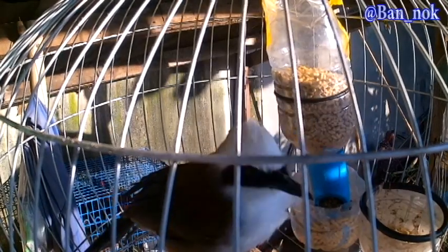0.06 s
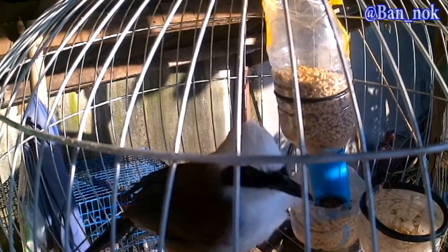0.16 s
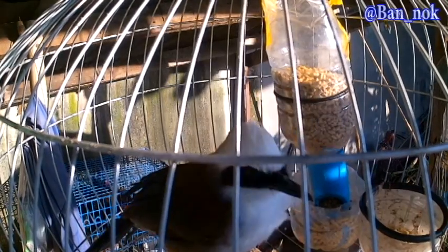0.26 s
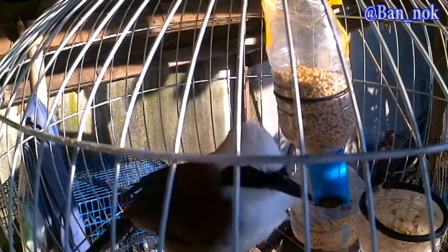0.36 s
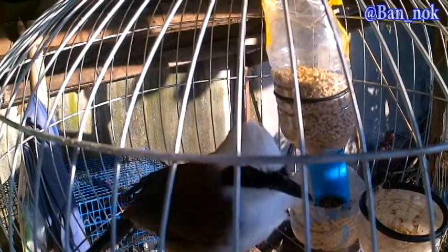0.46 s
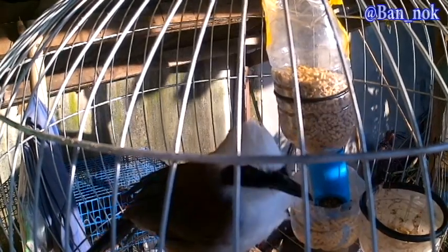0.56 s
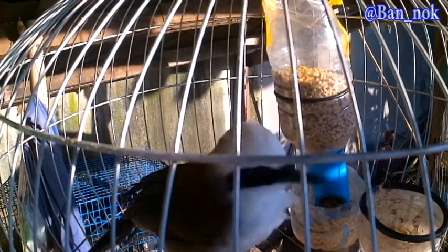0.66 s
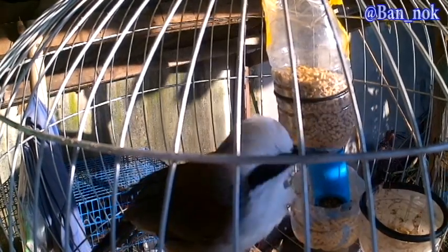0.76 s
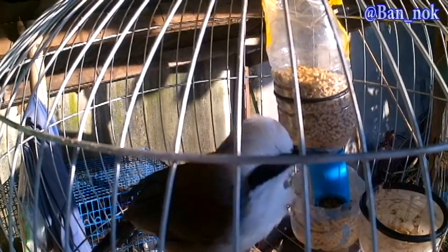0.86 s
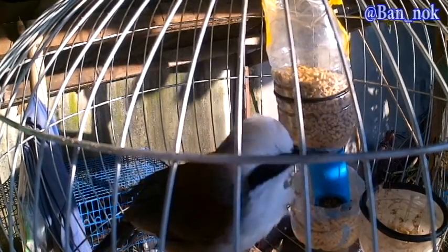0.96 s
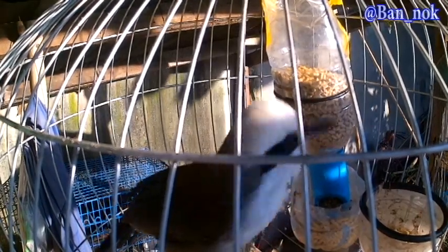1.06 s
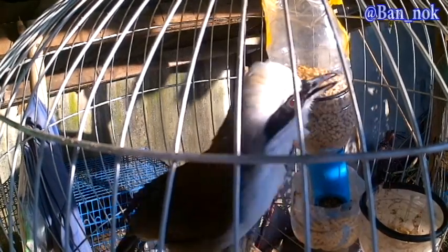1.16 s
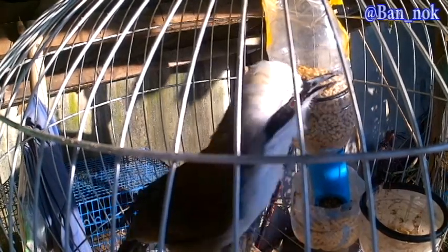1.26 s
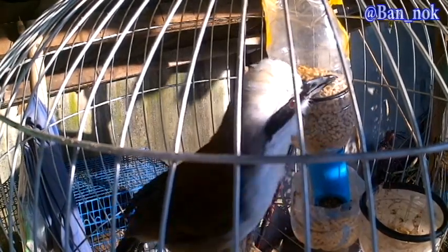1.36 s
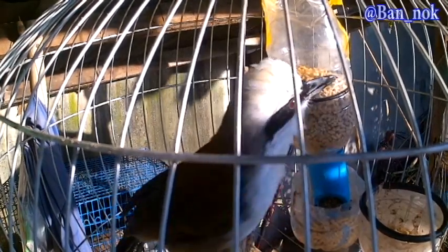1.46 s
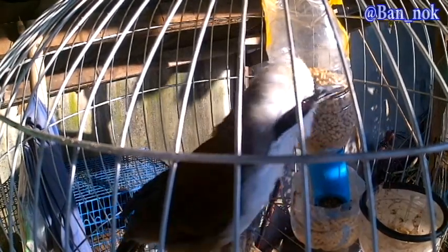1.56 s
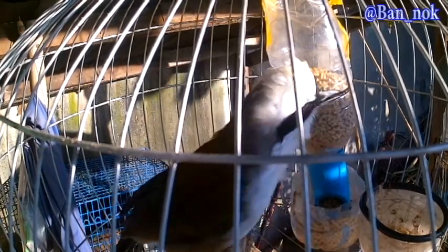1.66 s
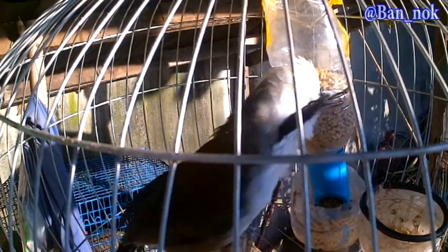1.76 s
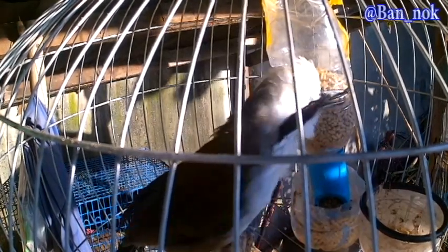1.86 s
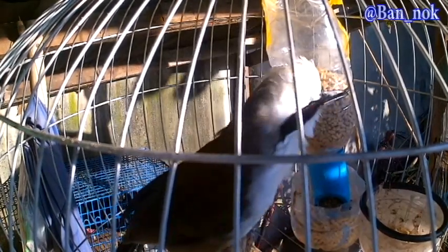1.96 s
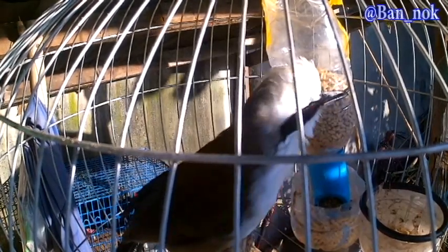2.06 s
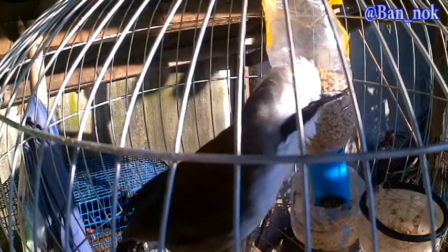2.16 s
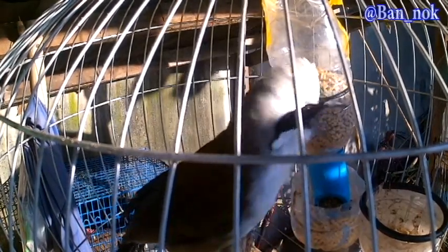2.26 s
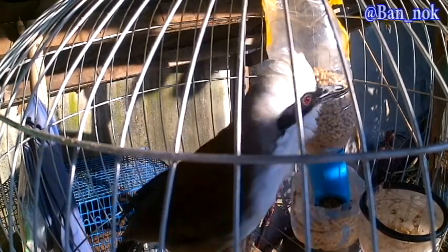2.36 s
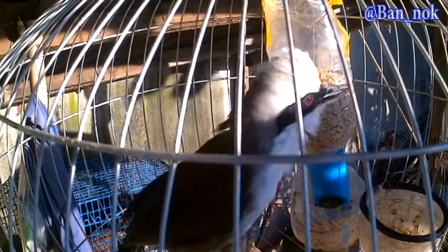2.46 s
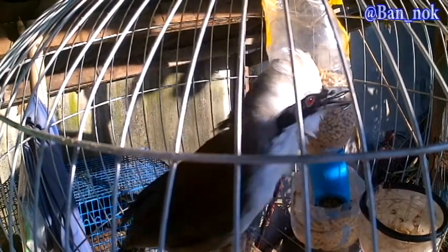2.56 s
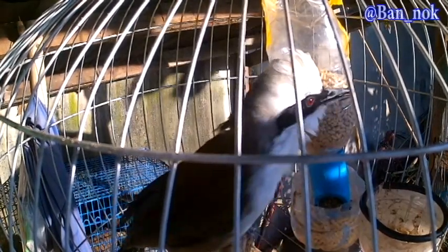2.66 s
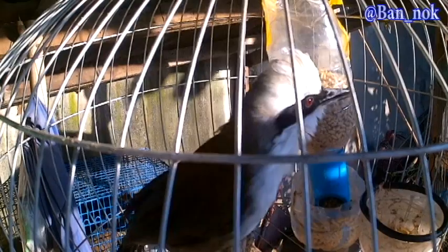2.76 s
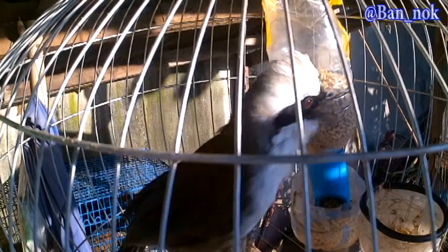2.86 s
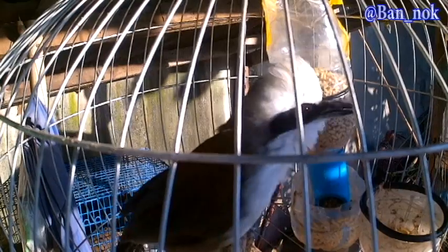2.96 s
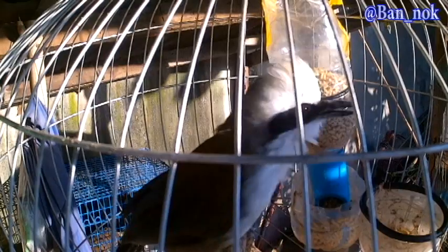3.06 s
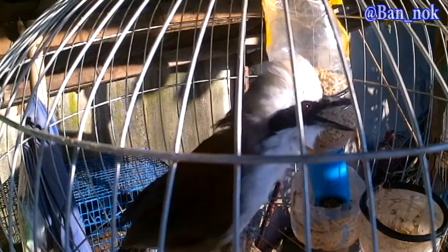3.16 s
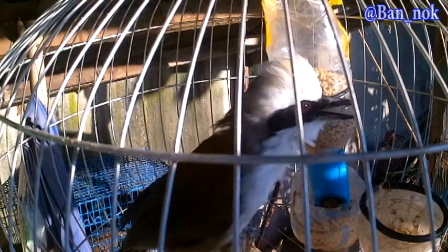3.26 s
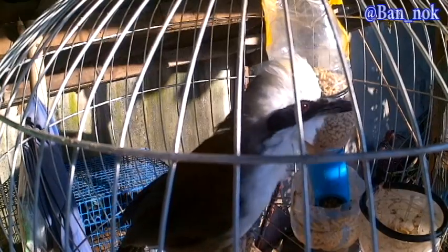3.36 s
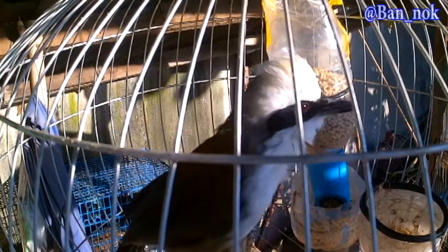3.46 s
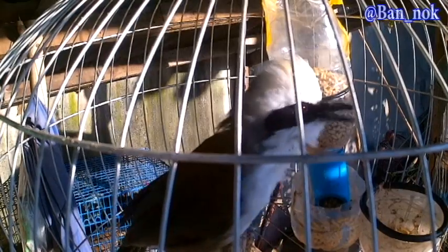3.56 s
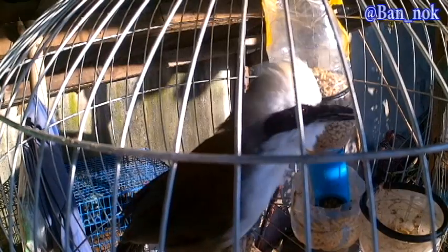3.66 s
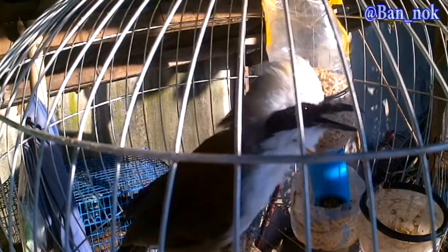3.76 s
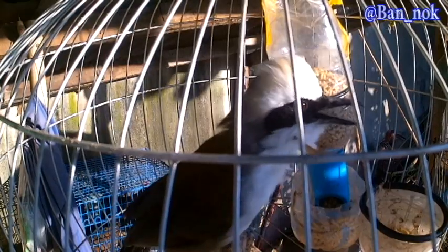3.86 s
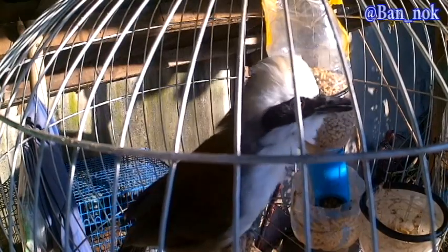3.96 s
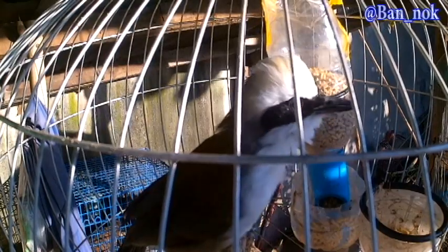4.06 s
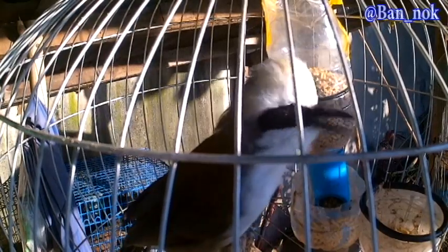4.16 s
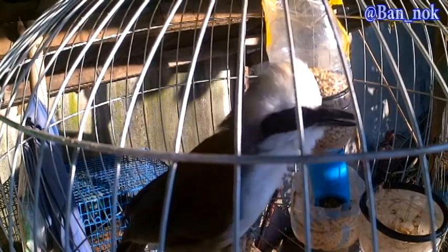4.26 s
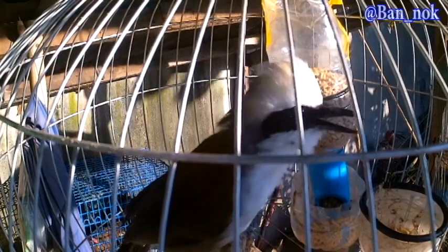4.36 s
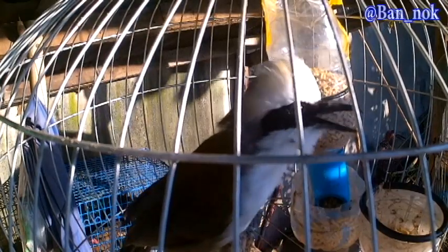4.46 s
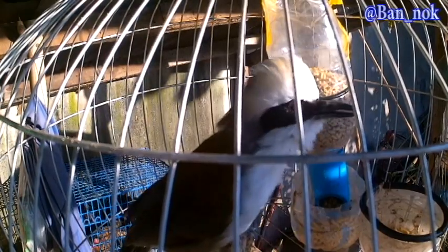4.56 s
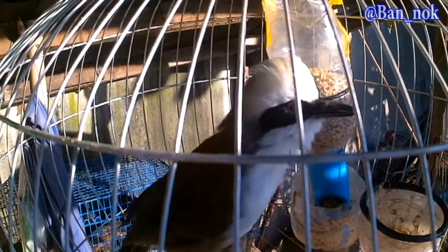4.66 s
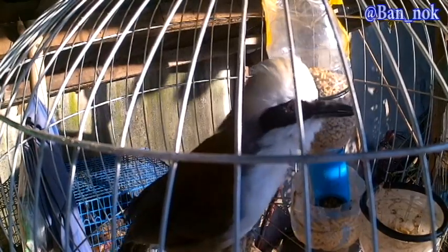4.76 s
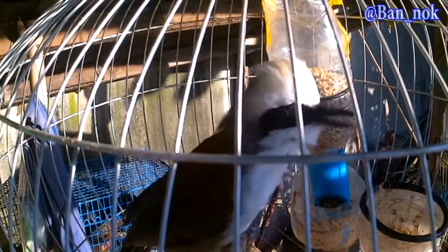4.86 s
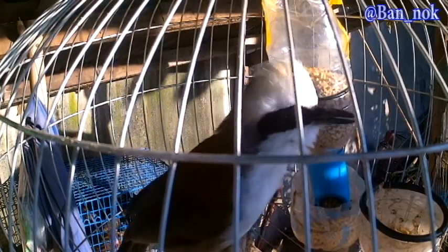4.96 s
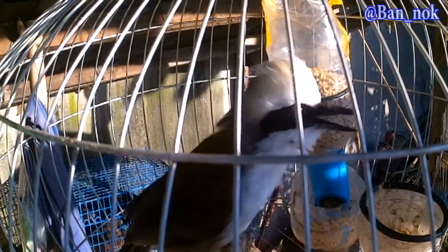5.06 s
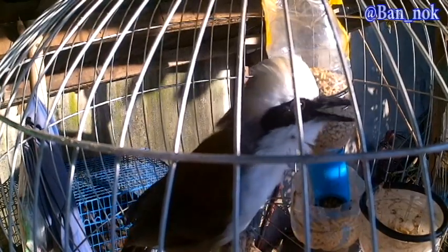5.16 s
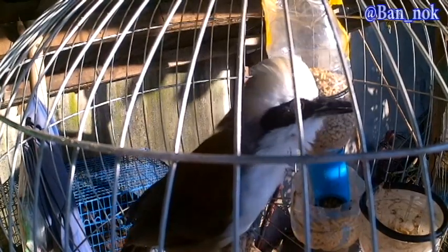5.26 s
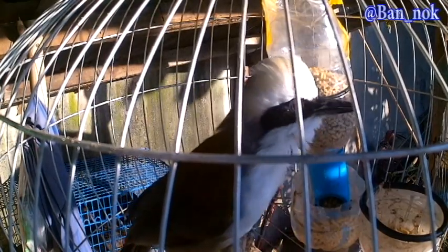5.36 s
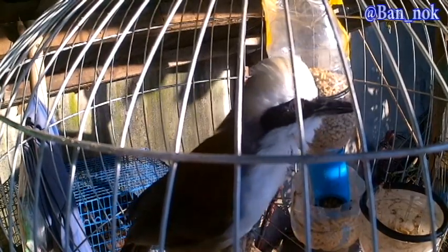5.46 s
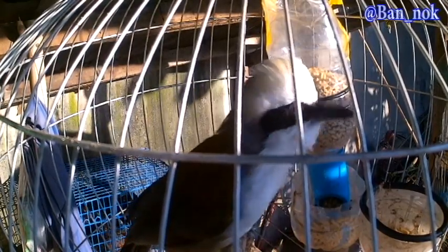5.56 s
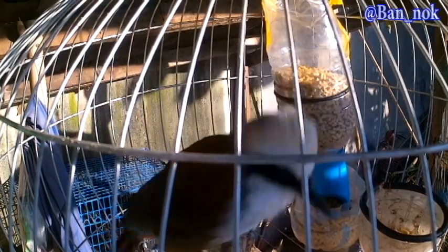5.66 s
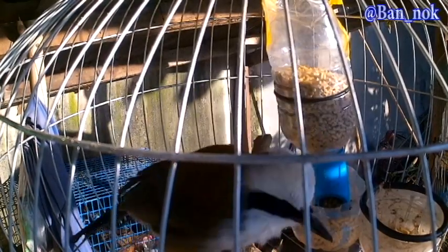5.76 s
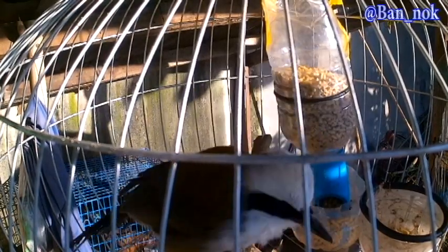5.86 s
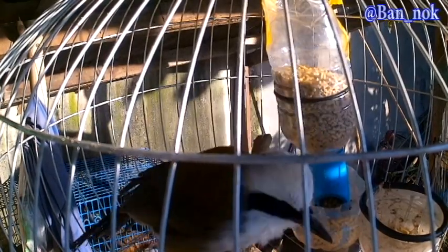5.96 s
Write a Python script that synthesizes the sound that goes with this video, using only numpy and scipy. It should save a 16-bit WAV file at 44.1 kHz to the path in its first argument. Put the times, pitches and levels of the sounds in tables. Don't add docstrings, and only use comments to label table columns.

```python
import sys
import numpy as np
from scipy import signal
from scipy.fft import rfft, irfft, next_fast_len
from scipy.io import wavfile
from scipy.ndimage import uniform_filter1d, minimum_filter1d

SR = 44100
rng = np.random.default_rng(int(sys.argv[2]) if len(sys.argv) > 2 else 0)


def unload_wav(signal):
    wavfile.write(
        sys.argv[1],
        SR,
        np.round(np.clip(np.atleast_2d(signal).T, -1, 1) * 32767).astype(np.int16),
    )


def voltage_ratio(level):
    return 10 ** (np.asarray(level, float) / 20)


N = 265437


def thrush():
    throats = { "opening": [(1400, -3.5), (1950, 23), (2300, -8), (2900, -6.5), (3500, 8), (4300, -13.5),
               (5100, -16.5), (5900, -12.5), (6900, 8), (7600, -4.5), (8700, -13), (9200, -36),
               (10300, -12.5), (12000, -17), (15800, -23)], "first yelp": [(2900, -28.5), (3250, -9),
               (3450, 12), (3950, -15), (4500, 6.5), (5000, -14.5), (6100, -8.5), (7000, 0), (8100, -4),
               (9250, -30), (10300, -18.5), (11500, -29), (13000, -29.5), (15800, -30)],
               "long, beak up": [(2900, -12), (3500, -2), (4000, -8), (4700, -4.5), (5150, -7.5), (5600, 7),
               (6200, -0.5), (7000, -6.5), (8000, -23.5), (8800, -16.5), (9500, -14), (11500, -16),
               (13000, -28.5), (15800, -26)], "beak up": [(2900, -27.5), (3250, -17), (3500, 9),
               (3950, -13.5), (4600, 5.5), (5200, 0.5), (5900, -6), (6600, -11.5), (7500, 1), (8200, -8.5),
               (8800, -15), (9500, -20), (11500, -21), (13000, -39), (15800, -40.5)],
               "beak level": [(2900, -26), (3300, -11.5), (3600, -3), (4000, -10), (4700, -2.5), (5400, 8),
               (6000, -8.5), (6900, 2), (7500, -3), (8200, -14), (9500, -20), (11500, -11), (12500, -35.5),
               (14000, -29), (15800, -38.5)], "long": [(1500, 2.5), (2900, -12.5), (3500, -5), (4000, -7),
               (4700, 0.5), (5050, -8.5), (5450, 7.5), (5900, -3), (6600, -12.5), (8000, -18), (9500, -14),
               (11500, -21.5), (13000, -25.5), (15800, -29)]}
    hoarseness = {"opening": (-6.5, -14, 720, 0.7), "beak up": (-7.5, -12, 450, -0.15),
                  "beak level": (-12, -15, 599, 0.66), "long": (-12.5, -21, 511, 0),
                  "first yelp": (-9, -10, 496.5, 0), "long, beak up": (-14.5, -21.5, 513, 0.5)}
    unevenness = {"opening": (.5, .065), "beak up": (.42, .03), "beak level": (.36, .022),
                  "long": (.65, .08), "first yelp": (.5, .045), "long, beak up": (.65, .075)}

    climb = [
        (0, .84, -49, -8, -43),
        (.04, .88, -34.5, 0.5, -44),
        (0.072, .93, -30, 2.5, -28.5),
        (0.287, 1.2, -21.5, -4, -23.5),
        (.346, 1.78, -15, 11, -17.5),
        (.41, 1.99, -13, 13, -13),
        (0.484, 1.68, -6.5, 22.5, -21.5),
        (.56, .98, -16.5, 15, -26),
    ]
    warble = [
        (.614, 1.73, -17.5, 3, -18),
        (.68, 1.01, -15, 17, -24.5),
        (.75, 1.7, -6, 17, -22.5),
        (.893, 1.47, -17, 11, -19.5),
        (.946, .99, -18, 12.5, -16.5),
        (1.001, 0.44, -27.5, 36, -38.5),
    ]
    catch = [
        (0, .5, -34.5, -2, -47),
        (0.037, .7, -42, 5.5, -38),
        (.075, .76, -30.5, 11.5, -21),
        (.125, .76, -29.5, 13.5, -18),
    ]
    first_yelp = [(0.157, .965, -20, 3.3, -27), (.3, 1.05, -7.5, 24, -22.5), (.4, 1.55, -15, 16, -13.5),
                  (0.499, 1.8, -16.5, 13.4, -9.5), (.766, 1.8, -16, 14, -14.5), (.872, .81, -8, 16.4, -8),
                  (1.001, .39, -26.5, 10, -18.5)]
    yelp = [(.145, 1.1, -16, 7.3, -22), (.2, 1., -12.5, 20, -20), (0.279, 1.01, -12, 37, -22),
            (.49, 1.5, -18, 24, -5), (0.628, 1.88, -15, 27, -11), (.74, 1.95, -16, 21, -16),
            (.81, .97, -11, 18.2, -4.5), (0.881, .63, -23.5, 6.5, 1), (1.001, .33, -34, 14, -11)]
    second_yelp = [(.145, .99, -18.5, 8, -18), (0.279, 1.01, -11.5, 30, -20), (.45, 1.4, -17.5, 24, -7),
                   (.55, 1.85, -20, 25.4, -5), (.7, 1.98, -16, 25, -9), (.76, 1.9, -12, 22, -16),
                   (.81, .97, -10.5, 18.2, -4.5), (0.879, .63, -22.5, 5.5, -2), (1.001, .33, -33, 18, -11)]
    flip = [(0.139, .97, -14, 15, -10), (.27, 1.05, -16.5, 37, -11), (0.412, 1.3, -16, 18, -9),
            (0.451, 1.3, -17, 11.5, -17.5), (.47, 2.02, -16, -31, -18.5), (0.603, 1.6, -15.5, -24, -14.5),
            (.74, .92, -14, -13, -12), (.82, 0.49, -11.5, 12, -23.5), (1, 0.32, -43, 32, -23)]
    stumble = [
        (0, 0.82, -51, 23, -44.5),
        (.12, .75, -27.5, 27, -36),
        (0.24, .76, -19.5, 25.5, -33.5),
        (.27, 1.99, -14.5, -50.5, -28.5),
        (.69, 1.01, -12, -42, -27.5),
        (.85, 0.752, -10, -15.5, -12),
        (1, 0.42, -68, 77, -48),
    ]
    dip = [
        (0, 1.99, -47, -29, -44),
        (.19, 1.5, -17.5, -34, -32.5),
        (.64, 1.01, -13.5, -61.5, -20.5),
        (.81, .88, -12, -24.5, -23),
        (1.001, 0.3855, -11.5, 17.5, -38.5),
    ]
    first_peak = [(0, .79, -39.5, -35, -43), (.048, .985, -15.5, -29, -36), (0.164, 1.17, -14, -46, -25.5),
                  (.3, 1.99, -13.5, -22.5, -24), (.46, 1.68, -13, -36, -34.5),
                  (.62, 1.28, -11.5, -50.5, -24.5), (.91, 1.01, -19.5, -32, -27),
                  (1, 0.66, -72.5, 2, -20.5)]
    peak_gesture = [(0, .8, -20, -52, -43.5), (0.053, .95, -14.5, -30, -30.5),
                    (.15, 1.25, -13.5, -44, -21.5), (.29, 1.99, -11, -29, -29.5),
                    (0.419, 1.9, -12.5, -34.5, -26.5), (.55, 1.45, -11.5, -41.5, -30.5),
                    (.72, 1.22, -11, -44.5, -22), (0.899, 1.01, -18.5, -29.5, -18.5),
                    (1, .5, -46, -15, -21.5)]
    second_peak = [(0, .8, -23, -42, -40), (0.053, .95, -12.5, -34, -29), (.15, 1.25, -14.5, -42, -21),
                   (.26, 1.85, -12, -30, -27), (.36, 2.0, -11.5, -29, -25.5), (0.45, 1.75, -14, -33, -25),
                   (.55, 1.42, -12.5, -40, -29), (.72, 1.22, -11, -42, -24.5),
                   (0.899, 1.01, -18.5, -29, -17.5), (1, .5, -44.5, -13, -19)]
    scoop = [
        (0, .52, -44.5, 3.5, -26),
        (0.031, .55, -28.5, 10, -33.5),
        (0.054, .68, -13, -16, -34),
        (.09, .69, -11.5, -22, -34),
    ]
    arch = [
        (0.148, .967, -14, -43, -21.5),
        (0.267, 1.6, -11.5, -42, -24),
        (0.416, 1.99, -9.5, -36.5, -27),
        (0.524, 1.86, -12, -32, -21.5),
        (0.654, 1.47, -10, -43.5, -25),
        (.8, 1.22, -10.5, -40, -24),
        (0.94, .99, -20, -25, -12),
        (1.021, 0.28, -37.5, 9, -27),
    ]

    # start t/s, length/s, resting f/Hz, crest f/Hz, strength level/dB
    opening_notes = [
        (0.999, .279, 630.6, 916, -0.5),
    ]
    first_yelps = [
        (1.474, 0.09483, 1045, 1138, 0.1),
    ]
    stumbles = [
        (1.686, .052, 1115, 1156, 0.091),
    ]
    first_peaks = [
        (1.744, 0.1865, 1347, 1715, 0.077),
    ]
    yelps = [
        (2.19, 0.10476, 1050, 1252, 0.094),
    ]
    dips = [
        (2.403, .052, 1193, 1400, -0.37),
        (3.057, .052, 1185, 1352, 0.44),
    ]
    peaks_sung = [
        (2.459, .19, 1405, 1655, -0.65),
    ]
    second_yelps = [
        (2.842, 0.1126, 1058, 1306, -0.17),
    ]
    second_peaks = [
        (3.112, 0.19, 1382, 1648, 1),
    ]
    flips = [
        (3.518, 0.1009, 1086, 1502, 0.015),
        (4.137, 0.095, 1103, 1479, 0.13),
        (4.802, .094, 1105, 1393, -0.49),
    ]
    arches = [
        (3.722, 0.23, 1380, 1629, 0.11),
        (4.332, 0.23, 1368, 1616, 0.053),
        (5.003, 0.23, 1350, 1593, -0.57),
    ]

    song = (
        ("opening", climb + warble, opening_notes),
        ("first yelp", catch + first_yelp, first_yelps),
        ("long, beak up", stumble, stumbles),
        ("long, beak up", first_peak, first_peaks),
        ("beak up", catch + yelp, yelps),
        ("long, beak up", dip, dips),
        ("long, beak up", peak_gesture, peaks_sung),
        ("beak up", catch + second_yelp, second_yelps),
        ("long, beak up", second_peak, second_peaks),
        ("beak level", catch + flip, flips),
        ("long", scoop + arch, arches))
    out = np.zeros(N)
    for kind, gesture, notes in song:
        sink = 0.064 if kind == "opening" else 0
        for row in notes:
            rows = note(gesture, *row)
            start, voice = stroke(rows, throats[kind], *hoarseness[kind], *unevenness[kind], sink)
            out[start:start + len(voice)] += voice
    return signal.sosfilt(signal.butter(3, 380, "high", fs=SR, output="sos"), out)


def note(gesture, start, length, rest_hz, crest_hz, strength_db):
    share, tension, level_db, tuning_db, edge_db = np.transpose(gesture)
    level_db = level_db + strength_db
    hz = np.interp(tension, [0, 1, 2.], [0, rest_hz, crest_hz])
    hz = hz + np.maximum(tension - 2, 0) * (crest_hz - rest_hz)
    first_db = level_db - np.maximum(tuning_db, 0)
    second_db = level_db + np.minimum(tuning_db, 0)
    return np.transpose([start + length * np.sort(share), hz, first_db, second_db, level_db + edge_db])


def stroke(rows, throat, rasp_db, blur_db, blur_hz, follow, scatter, jitter, sink):
    # t/s, length/s, level/dB
    pushes = [(1.1, 0.067, 0), (1.53, 0.061, 3), (1.728, .012, -6), (2.25, .05, 0), (2.536, 0.011, 4),
              (2.6, 0.035, -6), (2.9, .07, 1.5), (3.135, 0.016, 5.5), (3.18, 0.041, 3), (3.3, 0.04, 3.5),
              (3.565, .03, 0), (3.895, .04, -6), (4.152, .014, 3.5), (4.49, 0.042, 0), (5.045, 0.023, 2),
              (5.185, .04, 3)]
    # t/s, length/s, level/dB, upper partial depth/0-1
    catches = [
        (1.869, 0.028, -51, 0),
        (2.543, 0.018, -37.5, 0.3),
        (2.592, 0.0303, -52, 0),
        (3.223, 0.014, -37, 0.86),
        (3.945, .03, -46, 0),
        (4.492, 0.013, -33.5, 0.3),
        (4.531, .025, -59.5, 0.1),
        (5.136, .025, -48, 0),
        (5.209, 0.021, -57.5, 0),
    ]
    # t/s, length/s, level/dB
    swells = [(1.117, .012, 2.5), (1.138, .01, -3), (1.246, .014, 4.5), (1.488, .008, -4), (1.53, .03, 2),
              (1.795, .01, -2.5), (1.897, .015, -1.5), (2.206, .008, -4), (2.512, .012, -2), (2.59, .02, 2),
              (2.858, .008, -2.5), (3.28, .025, -3), (3.532, 0.00596, -2), (3.827, .03, 1.5),
              (3.925, .02, -2), (4.435, .025, 1.5), (4.529, .025, -2), (4.815, .006, -3.5),
              (4.838, .015, -2), (5.195, .018, -3), (5.215, .016, 3.5)]

    s, *columns = np.transpose(rows)
    t = np.arange(int(s[0] * SR), int(s[-1] * SR)) / SR
    hz, first_db, second_db, upper_db = (
        uniform_filter1d(np.interp(t, s, c), size=90, mode="nearest") for c in columns)
    upper_db = uniform_filter1d(upper_db, size=300, mode="nearest")
    upper_db = upper_db + sum(db * bump(t - at, length) for at, length, db in pushes)
    slack_db = .5 * np.minimum(np.gradient(np.log(hz)) * SR + 12, 0)

    hz = hz * (1 + 0.0042 * walk(98, len(t)))
    phase = 2 * np.pi * np.cumsum(hz) / SR
    low = voltage_ratio(first_db) * np.sin(phase) + voltage_ratio(second_db) * np.sin(2 * phase)
    spells = [(bump(t - at, length), db, depth) for at, length, db, depth in catches]
    half_pitch = sum(voltage_ratio(db) * spell for spell, db, depth in spells) * np.sin(phase / 2)
    strong_weak = 1 + 2 * sum(depth * spell for spell, db, depth in spells) * np.sin(phase / 2)

    shaky = phase + jitter * walk(150, len(t))
    dull_db = 0.49 * np.minimum(upper_db + 42.5, 0)
    effort = voltage_ratio(upper_db)
    mean_hz = np.sum(hz * effort) / np.sum(effort)
    held_hz = hz * (mean_hz / hz) ** follow * (1 + sink * np.linspace(-.5, .5, len(t)))
    upper, power = 0, 0
    for k in range(3, 30):
        colour_db = shape(throat, k * (held_hz if k > 4 else hz))
        gain = voltage_ratio(colour_db + dull_db * np.log2(k * hz / 4000)) * (k * hz < 16000)
        share = scatter * min(k / 6, 1.5)
        swelling = voltage_ratio(0.3 * min(k, 9) * walk(25.7, len(t)))
        scattering = np.sqrt(1 - share ** 2) + share * walk(220, len(t))
        upper = upper + gain * swelling * scattering * np.sin(k * shaky + k * k)
        power = power + gain ** 2 * (k * hz > 2900)
    upper = voltage_ratio(upper_db + slack_db) * strong_weak * upper / np.sqrt(power)

    breath = noise(lambda f: voltage_ratio(shape(throat, f)) * (f > 2400) * f ** 2 / (f ** 2 + 5500 ** 2), SR // 2)
    rasp = breath[:len(t)] * voltage_ratio(rasp_db + 2.0 * dull_db + 2.0 * walk(22, len(t)))
    ragged_db = 14.5 * np.exp((t[0] - t) / 0.007)
    blur = voltage_ratio(blur_db + ragged_db) * noise(peak(0, blur_hz), SR // 2)[:len(t)] * low

    voice = np.sqrt(2) * (low + half_pitch + blur + upper) + voltage_ratio(upper_db + 0.25 * slack_db) * rasp
    voice = voice * voltage_ratio(sum(db * bump(t - at, length) for at, length, db in swells))
    return int(s[0] * SR), voice * signal.windows.tukey(len(t), 130 / len(t))


def beak_breath():
    # t/s, length/s, centre f/Hz, glide/Hz per s, width/Hz, level/dB
    knots = [(1.215, 0.087, 6100, -1, 1400, -40), (1.04, 0.055, 3900, 0, 1400, -50.5),
             (3.93, .03, 5500, -3000, 600, -36), (4.535, 0.026, 5450, -3000, 520, -34),
             (5.208, 0.02, 5450, -4000, 370, -26), (3.275, 0.039, 5600, -3000, 390, -36.5),
             (2.457, .016, 1000, 0, 630, -22.5), (3.11, .018, 1050, 0, 560, -21.5),
             (1.742, .016, 1000, 0, 700, -27), (2.54, .014, 5650, 0, 500, -33.5),
             (1.225, .045, 6650, 0, 400, -33), (1.115, .03, 7250, 0, 500, -33),
             (1.012, 0.018, 1100, 0, 1200, -38.5), (5.13, .025, 5500, 0, 700, -40.5)]
    return bands(knots)


def voice_cracks():
    # t/s, length/s, centre f/Hz, width/Hz, level/dB
    cracks = [
        (1.551, 0.007, 2418, 500, -21),
        (1.733, 0.0081, 1300, 301, -28),
        (2.265, 0.0091, 2648, 500, -23.5),
        (2.929, 0.005, 2490, 600, -18),
        (3.565, 0.0038, 2460, 400, -23.5),
        (4.181, 0.004, 2486, 401, -26),
        (4.845, 0.0046, 2510, 400, -19.5),
    ]
    return bands([(s, length, hz, 0, width, db) for s, length, hz, width, db in cracks])


def far_birds():
    # t/s, length/s, centre f/Hz, width/Hz, level/dB
    rasps = [(0.032, 0.097, 4195, 1800, -59.5), (0.186, 0.15, 4233, 3000, -71),
             (0.701, 0.025, 2579, 300, -61), (0.821, .03, 4580, 3000, -64), (0.903, 0.054, 4800, 1500, -60),
             (0.934, 0.11, 2760, 720, -60), (2.163, 0.073, 4110, 1607, -60.5),
             (4.321, 0.12, 4180, 2028, -56.5), (4.741, 0.085, 4420, 2390, -62),
             (5.298, .03, 2842, 495, -60.5), (5.327, .2, 1109, 1250, -49),
             (5.385, 0.085, 895, 120.3, -48.5), (5.411, 0.026, 4576, 3480, -57),
             (5.412, 0.0285, 3640, 150.7, -57.5), (5.42, 0.046, 5440, 293, -66),
             (5.684, .05, 5670, 252, -68), (5.72, .12, 4905, 1810, -68), (5.946, 0.071, 5670, 598, -70)]
    # t/s, length/s, centre f/Hz, glide/Hz per s, width/Hz, level/dB
    falling_rasp = (0.444, 0.13, 4800, -9000, 2200, -63)
    # t/s, length/s, centre f/Hz, glide/Hz per s, level/dB
    chirps = [
        (0.43, 0.048, 5900, -2000, -64),
        (1.411, 0.0169, 5015, 60000, -59.5),
        (1.438, 0.029, 5800, 8002.5, -53.5),
        (1.502, 0.012, 5535, -70000, -53.5),
    ]
    calls = [(s, length, hz, 0, width, db) for s, length, hz, width, db in rasps]
    calls += [falling_rasp]
    chirp_width_hz = 350
    calls += [(s, length, hz, glide, chirp_width_hz, db) for s, length, hz, glide, db in chirps]
    return bands(calls)


def shed():
    # delay t/s, level/dB, signed share
    echoes = [
        (.00438, -11.5, 0.43),
        (.00526, -14.5, 0.37),
        (.00892, -8.5, -0.39),
        (0.0101, -31.5, -0.13),
        (0.012, -16, 0.58),
        (.01746, -21, -0.21),
        (0.0226, -30, -1.3),
    ]
    # f/Hz, width/Hz, share
    standing = [
        (1544, 39, -.7),
    ]
    # f/Hz, width/Hz, share
    rings = [
        (1370, 50, 0.27),
        (1498, 50, 0.29),
        (1765, 50, .3),
        (1850, 19, .3),
        (2525, 16, .9),
        (2550, 30, .3),
        (5520, 44, .3),
    ]
    t = np.arange(SR // 2) / SR
    room = np.zeros(len(t))
    room[0] = 1
    for delay, db, sign in echoes:
        room[int(delay * SR)] += sign * voltage_ratio(db)
    shed_t60_s, shed_db, yard_t60_s, yard_db = 0.11, -14, 0.49, -31.5
    near = noise(peak(0, 15000), len(t)) * np.exp(-np.log(1000) * t / shed_t60_s) * (t > .004)
    yard = noise(lambda f: peak(0, 9000)(f) * (1 + peak(2560, 450)(f)), len(t))
    yard = yard * np.exp(-np.log(1000) * t / yard_t60_s) * (t > .03)
    room += voltage_ratio(shed_db) * near / np.sqrt(np.sum(near ** 2))
    room += voltage_ratio(yard_db) * yard / np.sqrt(np.sum(yard ** 2))
    return room + signal.fftconvolve(room, modes(standing))[:len(room)] + modes(rings)


def modes(table):
    t = np.arange(SR // 2) / SR
    out = 0
    for hz, width, share in table:
        decay = np.exp(-np.pi * width * t)
        out = out + share * 2 * np.pi * width / SR * decay * np.cos(2 * np.pi * hz * t)
    return out


def background():
    return yard_air() + motor_hum() + distant_whine()


def yard_air():
    # f/Hz, level/dB per Hz
    air_colour = [(12, -13), (25, -0.5), (40, -6.5), (70, -9), (141, -12), (354, -17.5), (500, -15.5),
                  (1020, -22.5), (1210, -26.5), (1950, -30.5), (2150, -34), (5000, -39), (15700, -41)]
    air, swell = 0, walk(0.97)
    for hz in 22 * 2. ** np.arange(10):
        band = noise(lambda f: voltage_ratio(shape(air_colour, f)) * (f >= hz / np.sqrt(2)) * (f < hz * np.sqrt(2)))
        band_db = shape(air_colour, hz) + 0.35 * swell + 0.46 * walk(8.5)
        air = air + band * voltage_ratio(band_db) * np.sqrt(hz)
    return level(air, -48)


def motor_hum():
    # f/Hz, width/Hz, level/dB
    hums = [
        (59.6, 15, -53.5),
        (109, 31, -65.5),
        (329.9, 120, -56),
    ]
    hum = sum(voltage_ratio(db) * noise(peak(hz, width)) for hz, width, db in hums)
    tone_hz, tone_db = 58.4, -53.5
    return hum + voltage_ratio(tone_db) * np.sqrt(2) * np.sin(2 * np.pi * tone_hz * np.arange(N) / SR)


def distant_whine():
    # t/s, centre f/Hz, level/dB
    drift = [
        (0, 1775, -58),
        (1.001, 1786, -63.5),
        (2.101, 1765, -60.5),
        (3.401, 1850, -56.5),
        (5.402, 1876, -60.5),
        (6.02, 2007, -66.5),
    ]
    s, hz, db = np.transpose(drift)
    t = np.arange(N) / SR
    phase = 2 * np.pi * np.cumsum(np.interp(t, s, hz)) / SR
    pair = np.sin(phase) * noise(peak(0, 110)) + 1.2 * np.sin(.9 * phase) * noise(peak(0, 130))
    return pair * voltage_ratio(np.interp(t, s, db))


def bands(calls):
    out, t = np.zeros(N), np.arange(N) / SR
    for s, length, hz, glide, width, db in calls:
        near = slice(max(int((s - length) * SR), 0), int((s + length) * SR))
        u = t[near] - s
        wobble = noise(peak(0, width), SR // 2)[:len(u)]
        tone = np.sin(2 * np.pi * (hz * u + glide * u ** 2 / 2)) * wobble
        out[near] += voltage_ratio(db) * np.sqrt(2) * tone * bump(u, length)
    return out


def bump(u, length):
    return np.exp(-(2 * u / length) ** 2)


def level(x, db):
    return x * voltage_ratio(db) / np.sqrt(np.mean(x ** 2))


def shape(points, hz):
    p = np.array(points, float)
    return np.interp(np.log(np.maximum(hz, 1)), np.log(p[:, 0]), p[:, 1])


def noise(gain, size=N):
    fft_size = next_fast_len(size)
    hz = np.arange(fft_size // 2 + 1) * SR / fft_size
    x = irfft(rfft(rng.standard_normal(fft_size)) * gain(hz), fft_size)[:size]
    return level(x, 0)


def peak(centre_hz, width_hz):
    return lambda hz: 1 / (1 + ((hz - centre_hz) / (width_hz / 2)) ** 2)


def walk(rate, size=N):
    return noise(peak(0, 2 * rate), max(size, SR))[:size]


def scene():
    bird = thrush() + beak_breath() + voice_cracks()
    in_shed = signal.fftconvolve(bird + far_birds(), shed())[:N]
    return (in_shed + background())[None]


def roll_off(x):
    return signal.sosfilt(signal.butter(12, 15820, fs=SR, output="sos"), x)


def record(dry):
    soft = np.tanh(0.65 * dry) / 0.59
    ceiling, offset = .9, .0045
    room_left = np.minimum(ceiling / (np.abs(soft) + 1e-9), 1)
    gain = uniform_filter1d(minimum_filter1d(room_left, size=441), size=221)
    return roll_off(soft * gain + offset)


dry = scene()
out = record(dry)
unload_wav(out)
```